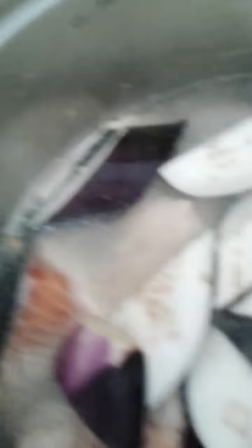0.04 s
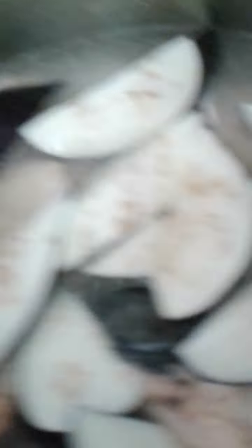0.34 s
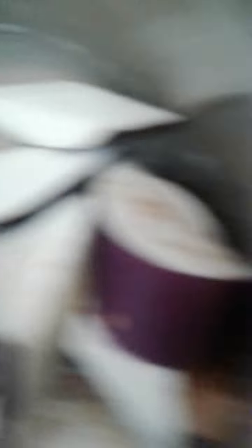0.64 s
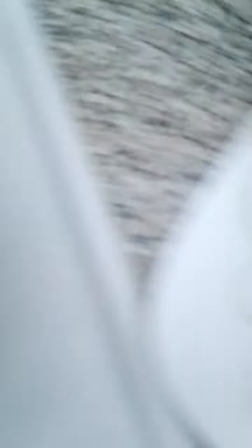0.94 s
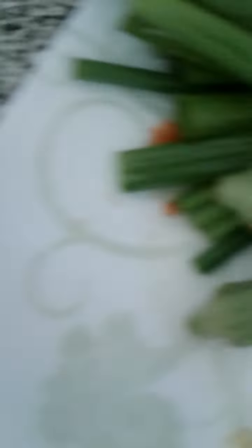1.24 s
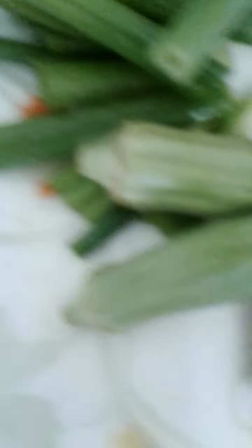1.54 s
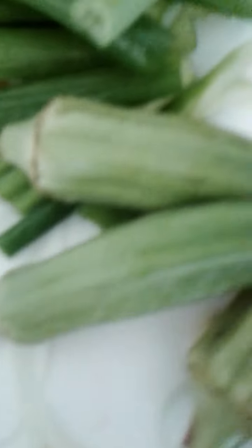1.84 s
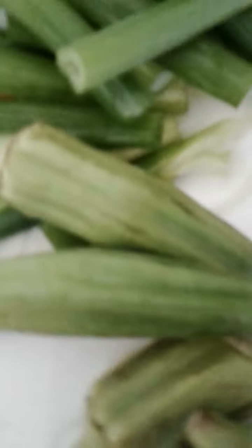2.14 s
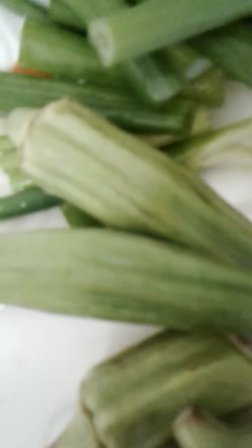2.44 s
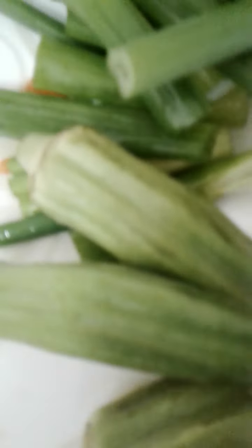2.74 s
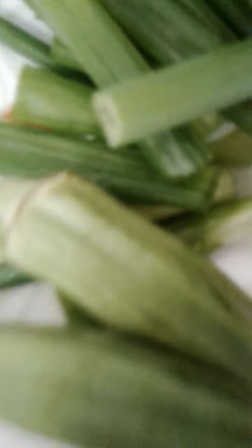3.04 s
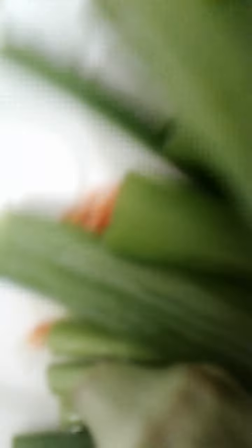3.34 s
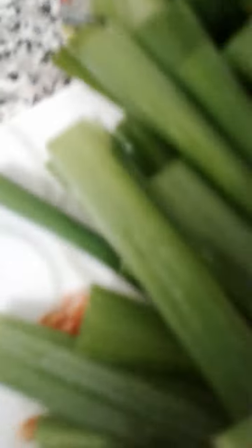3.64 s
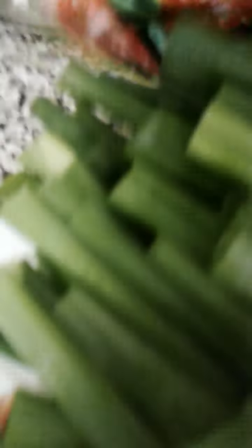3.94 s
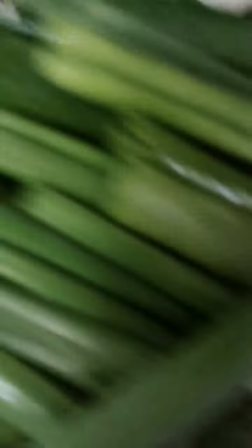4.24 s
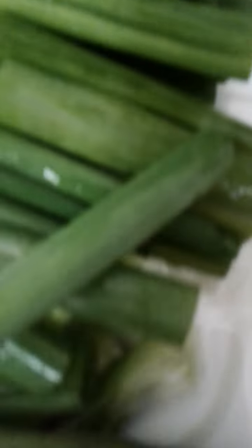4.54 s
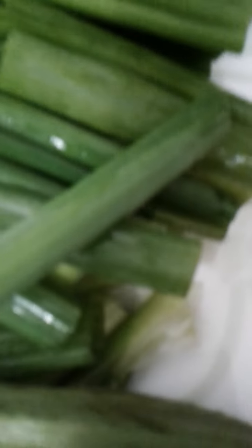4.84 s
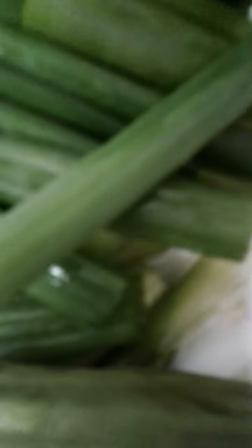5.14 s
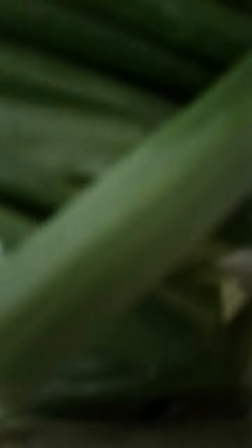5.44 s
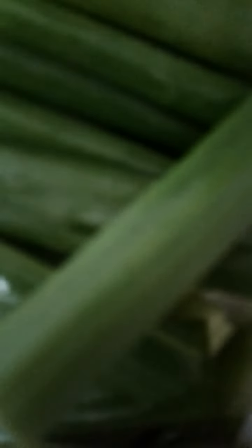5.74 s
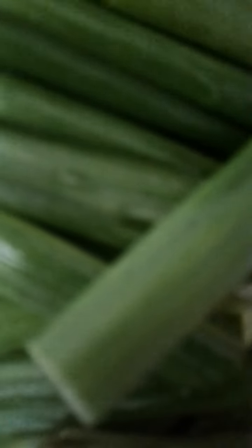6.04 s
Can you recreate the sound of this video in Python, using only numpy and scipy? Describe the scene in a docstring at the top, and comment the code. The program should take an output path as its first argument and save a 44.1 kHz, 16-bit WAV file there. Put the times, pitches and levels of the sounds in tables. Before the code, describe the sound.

Two bright, ringing clinks of a metal utensil on a pot open over the soft bubble and hiss of boiling water in a kitchen. A few faint ticks follow, then a brief swish and a low thump against the microphone. Close handling takes over, with clusters of sharp clicks, crackly rubbing and dull worktop knocks, the clicks thickening near the end while the pot keeps boiling.

```python
"""A pot of vegetables boils on a kitchen stove: steam bubbles resonate low under a fine sizzle.
Almost at once a metal utensil clinks twice against the pot and bounces, ringing the modes of both.
A few faint clicks and a soft swish follow, and something bumps the microphone. Then things are
handled close by: impacts give sharp little clicks, friction a crackling rustle, and dull knocks
ring the worktop, the last of them trailed by a faint tone. The pot boils on to the end."""
import sys
import numpy as np
from scipy import signal
from scipy.fft import rfft, irfft, next_fast_len
from scipy.io import wavfile
from scipy.ndimage import uniform_filter1d, minimum_filter1d

SR = 44100
rng = np.random.default_rng(int(sys.argv[2]) if len(sys.argv) > 2 else 0)


def generate_wav(sig):
    """Save sig (samples, or channels by samples) to the path in sys.argv[1] as 16-bit PCM at SR."""
    pcm = np.round(np.clip(np.atleast_2d(sig).T, -1, 1) * 32767).astype(np.int16)
    wavfile.write(sys.argv[1], SR, pcm)


N = 276507
TIME = np.arange(N) / SR


# utensil meets pot: (time [s], utensil ring [dB], pot ring [dB], utensil clash [dB], place [0 wall, 1 rim])
CONTACTS = [(0.2795, -21.5, -24, -11, 0), (0.284, -8, -35.5, -10.5, 0), (0.302, -13, -36, -20.5, 0),
            (0.3208, -12, -28, -6.5, 0), (0.3455, -13.5, -24, -9, 0.71), (0.4507, -54, -14, -29, 0),
            (0.454, -45.5, -10, -44.5, 0), (0.464, -42.5, -19, -40, 0.089), (0.509, -39.5, -18, -7.5, 0.48),
            (0.512, -17.5, -21, -13.5, 0.83), (0.527, -36, -20, -9, 0.88),
            (0.538, -40.5, -26.5, -7.5, 0.83), (4.224, -42, -33, -44, 0)]
# clear modes of the utensil: (frequency [Hz], relative level [dB], t60 [s])
UTENSIL_MODES = [(2400, -23, .18), (3420, -15, .14), (3695, 0, .165), (4102, -15, .15), (4200, -13, .14),
                 (4615, -10, .16), (5178, -21, .25), (5450, -19, .17), (6836, -25, .19), (9434, -37, .18)]
# clear modes of the pot: (frequency [Hz], struck on the wall [dB], struck on the rim [dB], t60 [s])
POT_MODES = [(655, -15, -17, .2), (1044, -19, -19, .2), (2411, -16, -17, .16), (2725, -11, -13, .19),
             (3402, -12, -7, .39), (3908, -10, -10, .2), (4166, 0, -6, .2), (4290, -12, -3, .35),
             (4730, -4, 0, .16), (5187, -4, -8, .17), (5515, -19, -10, .3), (5754, -32, -3, .21),
             (6182, -32, -9, .23), (6844, -16, -13, .21), (7455, -26, -19, .28), (8675, -36, -19, .17),
             (9490, -32, -16, .17)]
# spectra of the weak modes and of the full pot's clunk: (frequency [Hz], relative density [dB])
UTENSIL_CLASH_SPECTRUM = [(100, -49), (1300, -19), (2200, -18.5), (3800, -12), (5400, -5), (6200, -19),
                          (7800, -25.5), (10000, -39.5), (15500, -37.5)]
POT_CLASH_SPECTRUM = [(60, -32), (130, -14), (500, -22), (1300, -12.5), (2500, -3), (4600, -2),
                      (6200, -21.5), (7500, -22.5), (10000, -28.5), (15500, -39.5)]
CLUNK_SPECTRUM = [(50, -20.5), (120, 1.5), (200, -4), (450, -0.5), (800, -6), (1200, -9), (2500, -13.5),
                  (8000, -53.5)]
def clinks(size=SR // 3):
    """Impact excitation: utensil and pot ring freely; the point struck weights the pot's modes."""
    utensil_blows, pot_blows, clash_blows = (np.array(CONTACTS)[:, [0, k]] for k in (1, 2, 3))
    utensil_weak = dense_modes(UTENSIL_CLASH_SPECTRUM, t60=0.14, count=130)
    pot_weak = dense_modes(POT_CLASH_SPECTRUM, t60=0.26, count=150)
    out = struck(UTENSIL_MODES, utensil_blows, vary_db=3, pan_db=1, apart_rad=0.88)
    out += from_db(-10) * struck(utensil_weak, clash_blows, vary_db=3, pan_db=1.5, apart_rad=1.7)
    out += from_db(-5.5) * struck(pot_weak, pot_blows, vary_db=3, pan_db=2.5, apart_rad=1.7)
    hz, wall_db, rim_db, t60 = np.transpose(POT_MODES)
    for s, _, pot_db, _, on_rim in CONTACTS:
        loaded_hz = hz * (1 + .003 * rng.standard_normal(len(hz)))   # each contact loads the pot anew
        modes = np.column_stack([loaded_hz, wall_db + on_rim * (rim_db - wall_db), t60])
        out += struck(modes, [(s, pot_db)], vary_db=-2, pan_db=1.5, apart_rad=1.77)
        add(out, s, from_db(pot_db - 20) * noise(CLUNK_SPECTRUM, size) * blow(0.36, size))
    return out


# damping of the weak modes: (frequency [Hz], share of ring time [ratio])
RING_TIME_SHARE = [(1000, 0.96), (4500, 0.83), (8000, .72), (15000, .58)]
def dense_modes(spectrum, t60, count):
    """Modal density: thin metal has many weak modes, crowded low, sparse and more damped high."""
    hz = np.geomspace(900, 15000, count) * (1 + .008 * rng.standard_normal(count))
    scatter_db = np.interp(hz, [4000, 9000], [3, 5]) * rng.standard_normal(count)
    db = at_hz(spectrum, hz) + 10 * np.log10(hz) + scatter_db   # a sparser mode carries a wider band
    ring_s = t60 * at_hz(RING_TIME_SHARE, hz) * (1 + rng.uniform(-.33, .25, count))
    return np.column_stack([hz, db, ring_s])


def struck(modes, blows, vary_db, pan_db, apart_rad, size=SR // 3):
    """Modal superposition: each blow (time [s], level [dB]) starts damped sines of random phase."""
    hz, db, t60 = np.transpose(modes)
    waves = np.exp(2j * np.pi * hz[:, None] * TIME[:size]) * blow(t60[:, None], size)
    ear_phase = apart_rad / 2 * rng.choice([-1, 1], len(hz)) * [[1], [-1]]
    ears = np.exp(1j * ear_phase) * pan(pan_db)
    out = np.zeros((2, N))
    for s, level_db in blows:
        gain = from_db(db + vary_db * rng.standard_normal(len(hz)))
        gain /= np.sqrt(np.sum(gain ** 2) / 2)
        phasor = np.exp(2j * np.pi * rng.random(len(hz)))
        add(out, s, from_db(level_db) * ((ears * gain * phasor) @ waves).real)
    return out


CLICK_OFFSET_S = 0.000972   # ticks and handling clicks start this long after their listed times
# knocks: (time [s], force [dB], ring [dB], thump [dB], thump frequency [Hz], tick [dB])
WORKTOP_KNOCKS = [(3.0829, 1.5, -12.5, -22.5, 320, 4.5), (3.4656, -6.5, -20, -26, 320, -10),
                  (3.627, -16.5, -33.5, -35, 312, -23.5), (3.9583, -11, -25, -28.5, 313, -17),
                  (4.141, -22.5, -38.5, -33.5, 304, -19.5), (4.174, -20, -53, -30, 282, -29),
                  (4.223, -12, -48, -25.5, 345, -17), (4.245, -17.5, -57, -25, 382, -40),
                  (4.283, -23, -57, -45, 350, -35)]
# modes of the worktop: (frequency [Hz], relative level [dB], t60 [s])
WORKTOP_MODES = [(115, -10, .22), (250, -6, .1), (291, 0, .17), (375, -10, .14), (507, -2, .13),
                 (594, -4, .12), (821, -4, .14), (1093, -3, .13), (1420, -14, .12), (1650, -11, .12),
                 (1750, -12, .12), (1968, -14, .15), (2362, -13, .16)]
# spectra of the clatter and of a thump peaking at 320 Hz: (frequency [Hz], relative density [dB])
CLATTER_SPECTRUM = [(100, -10), (350, 6), (650, 12), (1100, 4), (2000, -4.5), (3000, -3.5), (4300, 3.5),
                    (5500, -15.5), (8000, -72), (14000, -64)]
THUMP_SPECTRUM = [(35, -57), (70, -7), (130, 0), (200, -5.5), (320, 6.5), (500, -6.5), (1500, -72)]
def knocks(size=SR // 3):
    """Plate vibration: a knock ticks, thumps, rings the worktop and rattles what stands on it."""
    ring_blows = np.array(WORKTOP_KNOCKS)[:, [0, 2]]
    out = struck(WORKTOP_MODES, ring_blows, vary_db=0.5, pan_db=2, apart_rad=0.76)
    for s, force_db, _, thump_db, thump_hz, tick_db in WORKTOP_KNOCKS:
        clatter = from_db(force_db - 7) * noise(CLATTER_SPECTRUM, size) * blow(0.09, size)
        tuned = np.array(THUMP_SPECTRUM) * [thump_hz / 320, 1]
        thump = from_db(thump_db + 1.5) * noise(tuned, size) * blow(0.15, size, rise_s=0.0064)
        burst_db = 6.2 * force_db - 7   # a brief burst of treble, like overload, on the loudest knock
        treble_burst = from_db(burst_db) * noise(SNAP_SPECTRUM, size) * blow(0.01, size)
        add(out, s, (clatter + thump + treble_burst) * pan(1.24))
        body_db = -15.5 - 0.19 * tick_db   # soft touches sound hollower
        add(out, s + CLICK_OFFSET_S, click(s, tick_db - 0.5, body_db, snap_db=-27, pan_db=0))
    return out


# hard contacts: (time [s], level [dB], relative body [dB], relative snap [dB], left over right [dB])
HANDLING_CLICKS = [(1.2059, -35.5, -24, -49.0, 14), (1.5666, -38, -20, -24.0, -1.0),
                   (1.9413, -29.5, -29, -45.0, 6), (2.7756, -4, -28, -21, 5.0),
                   (2.7909, -6.5, -18, -17.0, 8), (2.8142, -16, -19, -25, 4.0),
                   (2.8859, -15.5, -18, -20, 3), (2.893, -10.5, -18, -17, 11),
                   (2.9404, -6, -23.5, -12.5, 8), (2.9717, -3.5, -24.5, -18, 5.5),
                   (2.9899, -7.5, -18, -15, 6), (3.0497, -10.5, -25, -22, 11),
                   (3.2677, -31, -8.5, -29.0, -12.0), (3.3728, -18, -18.5, -35, 7.5),
                   (3.4234, -16.5, -18, -26, 10), (3.5061, -18.5, -24, -19, 4),
                   (3.6695, -15.5, -18, -26, 7.5), (3.8745, -37.5, -12.5, -34, -16),
                   (4.0087, -15, -20, -26, 9), (4.2519, -7, -27, -33, -1), (4.343, -27, -20, -29, -21),
                   (4.3516, -22.5, -16.5, -26, 0), (4.435, -33, -27, -35, -2), (4.5097, -9, -32, -27, -5.5),
                   (4.5293, -15.5, -35, -36, 0), (4.5954, -16, -21, -22, 9.0),
                   (4.6653, -15.5, -33, -16.0, -4.5), (4.6962, -22, -10.5, -33, 1),
                   (4.7917, -30.5, -6.5, -34.0, -4.0), (4.8127, -27, -17, -23, 2),
                   (4.8773, -21.5, -20.5, -33, 2), (4.9336, -10.5, -29.5, -18, -4.0),
                   (5.0802, -39.5, 4, -38, -2.5), (5.114, -34, -19, -29, -3.0), (5.2197, -13, -7, -19, 3),
                   (5.2596, -27, -5, -35.0, 5), (5.296, -26, -10, -32, 7), (5.3376, -16.5, -11, -27, 2),
                   (5.385, -20, -12, -31.0, 5.5), (5.3934, -21.5, -24.0, -30, 9),
                   (5.5477, -24.0, -10.5, -18, 1), (5.6941, -24.5, -12.5, -15, -1),
                   (5.7184, -22.5, -16.0, -12.5, 7), (5.7359, -10, -18, -21, 0),
                   (5.7517, -4, -28, -22, 2.5), (5.791, -5, -20, -25, 0), (5.7955, -14, -19, -31, 4.0),
                   (5.8057, -15, -18, -20.0, -9), (5.8215, -10.5, -14, -9.5, 6.5),
                   (5.8465, -6.5, -16.5, -16.0, 0), (5.8805, -7.5, -19, -8, 2.5),
                   (5.938, -15.5, -8.5, -13, 4.5), (5.9622, -20, -16.0, -27.0, -1),
                   (5.9703, -13.5, -23, -24, 5), (6.0463, -15.5, -15, -27, 4), (6.0552, -19, -12.5, -36, 4),
                   (6.0769, -18, -9.0, -34, 3), (6.0943, -17.5, -19, -20, -1), (6.1125, -12, -32, -34, 4.0),
                   (6.1458, -5, -24.5, -20, 6), (6.2027, -4, -22, -13, -2.0),
                   (6.2197, -14.5, -24, -25, 8.0)]
def clicks():
    """Impact noise: things handled close by give separate sharp little clicks."""
    out = np.zeros((2, N))
    for s, level_db, body_db, snap_db, pan_db in HANDLING_CLICKS:
        add(out, s + CLICK_OFFSET_S, click(s, level_db, body_db, snap_db, pan_db))
    return out


# the clicks reach the left ear first, later both ears together: (time [s], lead of the left ear [ms])
LEFT_EAR_LEAD = [(4.0, .38), (5.0, .03)]
# spectra of a click's parts: (frequency [Hz], relative density [dB])
SCATTER_SPECTRUM = [(1500, -29), (3200, 1), (4300, 6.5), (5300, -5.5), (7000, -27), (12000, -54)]
BODY_SPECTRUM = [(200, -15.5), (900, 1), (2200, 1), (3200, -4.5), (5000, 0), (8000, -54)]
SNAP_SPECTRUM = [(800, -28), (3000, -8.5), (5400, 8.5), (6300, 2.5), (8000, -7), (10000, -15.5),
                 (15000, -27.5)]
def click(s, level_db, body_db, snap_db, pan_db, centre_hz=4127, size=SR // 32):
    """Impact transient: a brief ping, a hollow body, a bright snap and scatter off nearby surfaces."""
    hz = centre_hz * np.exp(0.088 * rng.uniform(-0.89, 1))
    ping = signal.unit_impulse(size)
    for _ in range(3):   # resonators in series round the onset
        ping = ring(ping, hz, t60=0.0019)
    lead_ms = np.interp(s, *np.transpose(LEFT_EAR_LEAD))
    ping = place(ping / np.abs(ping).max(), pan_db=1, lag_ms=lead_ms)
    scatter = from_db(-8.5) * noise(SCATTER_SPECTRUM, size) * blow(0.023, size)
    body = from_db(body_db + 6) * noise(BODY_SPECTRUM, size) * blow(0.022, size, rise_s=0.00014)
    snap = from_db(snap_db + 1.9) * noise(SNAP_SPECTRUM, size) * blow(0.01, size, rise_s=0.000067)
    return from_db(level_db) * ((ping + body + snap) * pan(pan_db) + scatter)


# things rub together: (start [s], duration [s], level [dB])
RUB_STROKES = [(1.43, 0.04, -56), (1.561, 0.02, -54.5), (2.781, 0.053, -32.5), (2.92, 0.14, -35),
               (3.195, 0.022, -32), (3.402, 0.068, -36.5), (4.496, 1.0, -65), (5.205, .11, -43.5),
               (5.795, .07, -28.5), (5.945, 0.24, -39), (6.195, 0.023, -30.5)]
# spectrum of the slips: (frequency [Hz], relative density [dB])
SLIP_SPECTRUM = [(300, -16), (1000, -10.5), (2500, -4.5), (4300, 2.5), (5500, -11.5), (7000, -21.5),
                 (10000, -34), (15500, -45)]
def rustle(catches_per_s=24):
    """Stick-slip friction: surfaces rub in dense tiny slips and now and then catch with a click."""
    slips = np.array([grains(per_s=1600, spread_db=3.4), grains(per_s=1600, spread_db=3.44)])
    out = swells(RUB_STROKES, attack_s=0.0054, release_s=0.017) * colour(slips, SLIP_SPECTRUM) * pan(2)
    for start, length, level_db in RUB_STROKES:
        for when, softness, side in rng.uniform(-0.9, 1, (round(catches_per_s * length), 3)):
            s = start + length * (1 + when) / 2
            catch_db = level_db + 12.5 - 5 * softness
            add(out, s, click(s, catch_db, body_db=-18, snap_db=-27, pan_db=6.1 * side))
    return out


def bump(s=2.6358, hz=145, t60=0.019, left_db=-34.5, right_db=-10.5, size=SR // 8):
    """Damped oscillation: a bump on the microphone's right side gives a sharp edge and two low swings."""
    swing = np.cos(2 * np.pi * hz * TIME[:size]) * blow(t60, size, rise_s=0.000099)
    out = np.zeros((2, N))
    add(out, s, -swing * from_db([[left_db], [right_db]]))
    return out


# heard level of the boiling, dipping after clinks and knocks and slowly recovering: (time [s], level [dB])
HEARD_LEVEL = [(0, -47), (.45, -49), (1.05, -60.5), (1.5, -58.5), (2, -51.5), (2.6, -47), (2.95, -43.5),
               (3.3, -51.5), (3.8, -57), (4.1, -51.5), (4.5, -56.5), (5.1, -49.5), (6.27, -43.5)]
# soft swells of brushing hiss: (start [s], duration [s], level [dB])
HISS_SWELLS = [(1.16, 0.19, -60), (1.56, 0.16, -55.5), (1.86, 0.05, -50.5), (2.17, 0.31, -51),
               (2.64, 0.11, -49), (3.24, 0.11, -45), (5.6, 0.77, -46.5)]
# spectra of the churning water and of the sizzle: (frequency [Hz], relative density [dB])
CHURN_SPECTRUM = [(24, -43), (40, -21.5), (65, -4), (86, -18.5), (123, -1), (207, -19.5), (288, 1),
                  (373, -11.5), (555, -6.5), (1650, -19.5), (1800, -19), (2500, -23.5), (3250, -65),
                  (5500, -120)]
SIZZLE_SPECTRUM = [(1000, -13.5), (2500, -9), (3500, -1.5), (4400, 3), (5200, -8), (6500, -22), (9000, -35),
                   (15500, -44)]
def boil(sizzle_db=-57, sizzle_follows=0.97):
    """Boiling noise: bubbles ring over churning water, and countless tiny bursts sum to a sizzle."""
    heard_db = np.interp(TIME, *np.transpose(HEARD_LEVEL))
    steady = from_db(sizzle_db + sizzle_follows * (heard_db - heard_db.mean()))
    brushing = swells(HISS_SWELLS, attack_s=0.02, release_s=0.03)   # shares the sizzle's hiss
    bubbling = from_db(-3) * place(bubbles(), pan_db=6.5, lag_ms=.1)
    churn = from_db(-0.43) * noise(CHURN_SPECTRUM, N)
    bursts = np.array([grains(per_s=580, spread_db=3.2), grains(per_s=700, spread_db=2.5)])
    hiss = from_db(-0.5) * colour(bursts, SIZZLE_SPECTRUM) + noise(SIZZLE_SPECTRUM, N)
    return from_db(heard_db) * (bubbling + churn) + np.hypot(steady, brushing) * hiss


def bubbles(per_s=95, cycles=6, low_hz=420, high_hz=1350, count=16):
    """Bubble resonance: each bursting steam bubble rings a few cycles, small ones higher and weaker."""
    pops = grains(per_s, spread_db=3.4)
    size_class = rng.integers(0, count, N)
    return rms_one(sum(ring(pops * (size_class == k), hz, cycles / hz) / np.sqrt(hz)
                       for k, hz in enumerate(np.geomspace(low_hz, high_hz, count))))


# spectrum of the swish: (frequency [Hz], relative density [dB])
SWISH_SPECTRUM = [(1000, -34), (3000, -14), (4500, 15), (6000, -2), (9000, -21.5), (15000, -47)]
def swish(peak_s=2.395, width_s=0.072, level_db=-42.5):
    """Amplitude modulation: a soft band of bright noise swells and fades."""
    return from_db(level_db) * noise(SWISH_SPECTRUM, N) / (1 + ((TIME - peak_s) / width_s) ** 2)


def after_ring(start_s=4.3, hz=2010, length_s=0.16, level_db=-60):
    """Exponential decay: a faint pure tone swells after the last knocks and dies away."""
    envelope = swells([(start_s, length_s, level_db)], attack_s=0.027, release_s=0.054)
    return envelope * np.sqrt(2) * np.sin(2 * np.pi * hz * TIME)


# reverberation time of the kitchen: (frequency [Hz], t60 [s])
KITCHEN_T60 = [(100, 0.72), (500, 0.23), (2000, 0.3), (4500, 0.18), (12000, 0.14)]
def kitchen(x, size=SR // 2):
    """Reverberation: the diffuse field decays at its own rate in each octave."""
    edges = np.geomspace(60, 16000, 9)
    tail = sum(band(rng.standard_normal((2, size)), lo, hi)
               * fade(at_hz(KITCHEN_T60, np.sqrt(lo * hi)), size) for lo, hi in zip(edges, edges[1:]))
    tail *= 1 - fade(0.01, size)   # reflections take a moment to build up
    dulled = signal.sosfilt(signal.butter(2, 6500, fs=SR, output="sos"), x)   # walls absorb the treble
    return signal.fftconvolve(dulled, rms_one(tail) / np.sqrt(size), axes=1)[:, :N]


# likeness of the two ears: (frequency [Hz], correlation [ratio])
EAR_CORRELATION = [(100, 0.87), (400, 0.96), (1000, 0.045), (3000, 0.06), (10000, 0.071)]
def colour(pair, spectrum):
    """Interaural coherence: two unrelated signals mix to one stereo sound of a given spectrum, rms 1."""
    size = next_fast_len(pair.shape[1])
    hz = np.arange(size // 2 + 1) * SR / size
    mid, side = rfft(pair, size) * from_db(at_hz(spectrum, hz))
    alike = at_hz(EAR_CORRELATION, hz)
    both = np.sqrt(1 + alike) * mid + np.sqrt(1 - alike) * side * [[1], [-1]]
    return rms_one(irfft(both, size)[:, :pair.shape[1]])


def noise(spectrum, size):
    """Spectral shaping of white stereo noise."""
    return colour(rng.standard_normal((2, size)), spectrum)


def grains(per_s, spread_db):
    """Shot noise: random impulses, mostly small, a few large."""
    sizes = from_db(spread_db * np.minimum(rng.exponential(1, N), 4))
    return sizes * rng.choice([-1, 1], N) * (rng.random(N) < per_s / SR)


def ring(impulses, hz, t60):
    """Two-pole resonance: a unit impulse starts a damped sine of height 1."""
    radius, angle = np.exp(-np.log(1000) / (t60 * SR)), 2 * np.pi * hz / SR
    return signal.lfilter([0, np.sin(angle)], [1, -2 * radius * np.cos(angle), radius ** 2],
                          impulses + 1e-18)


def band(x, low_hz, high_hz):
    """Band-pass filtering with second-order slopes."""
    return signal.sosfilt(signal.butter(2, [low_hz, high_hz], "band", fs=SR, output="sos"), x)


def swells(rows, attack_s, release_s):
    """Envelopes (start [s], duration [s], level [dB]): linear rise, hold, exponential decay."""
    return sum(from_db(db) * np.clip((TIME - s) / attack_s, 0, 1)
               * np.exp(-np.maximum(TIME - s - length, 0) / release_s) for s, length, db in rows)


def blow(t60, size, rise_s=0.00098):
    """Impact envelope: a quick rise, then exponential decay."""
    return fade(t60, size) * (1 - np.exp(-TIME[:size] / rise_s))


def fade(t60, size):
    """Exponential decay: 60 dB down after t60 seconds."""
    return np.exp(-np.log(1000) * TIME[:size] / t60)


def place(x, pan_db, lag_ms):
    """Binaural cues: the left ear is pan_db louder and lag_ms earlier."""
    t = TIME[:len(x)]
    late = np.interp(t - np.round(lag_ms * SR / 1000) / SR, t, x, left=0)
    return np.array([x, late]) * pan(pan_db)


def pan(db):
    """Interaural level difference, left over right."""
    return from_db([[db / 2], [-db / 2]])


def add(out, s, sound):
    """Superposition: mix a sound in at time s."""
    at = round(s * SR)
    out[:, at:at + sound.shape[1]] += sound[:, :N - at]


def at_hz(points, hz):
    """Interpolation along log frequency."""
    known_hz, value = np.transpose(points)
    return np.interp(np.log(np.maximum(hz, 1)), np.log(known_hz), value)


def from_db(db):
    """Decibels to amplitude ratio."""
    return 10 ** (np.asarray(db) / 20)


def rms_one(x):
    """Normalisation to unit rms."""
    return x / np.sqrt(np.mean(x ** 2) + 1e-20)


def scene():
    """Direct and reverberant sound: all sources add; clinks, knocks and clicks weakly excite the room."""
    metal, thuds, ticks = clinks(), knocks(), clicks()
    room = kitchen(from_db(-14) * metal + from_db(-15) * (thuds + ticks))
    return boil() + metal + thuds + ticks + bump() + rustle() + swish() + after_ring() + room


def record(dry, low_hz=48, high_hz=16200, ceiling=.95):
    """Band and peak limiting: a small microphone loses deep bass; peaks are held and the top is cut."""
    thin = signal.sosfilt(signal.butter(4, low_hz, "high", fs=SR, output="sos"), dry)
    allowed_gain = ceiling / np.maximum(np.abs(thin).max(axis=0), ceiling)
    held = thin * uniform_filter1d(minimum_filter1d(allowed_gain, size=129), size=129)
    return signal.sosfilt(signal.ellip(10, .1, 80, high_hz, fs=SR, output="sos"), held)


dry = scene()
out = record(dry)
generate_wav(out)
```